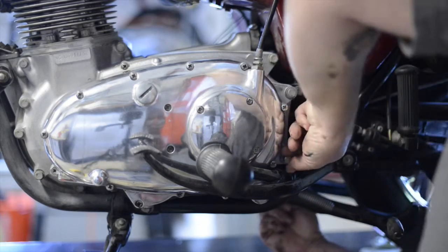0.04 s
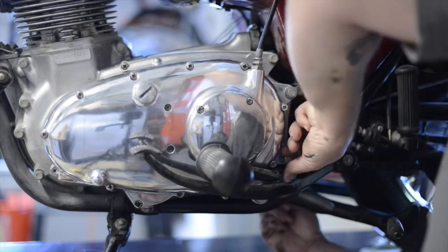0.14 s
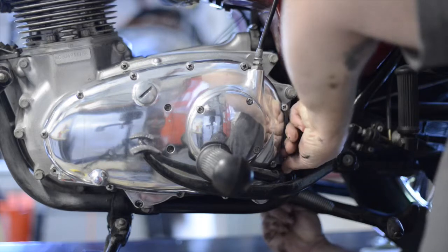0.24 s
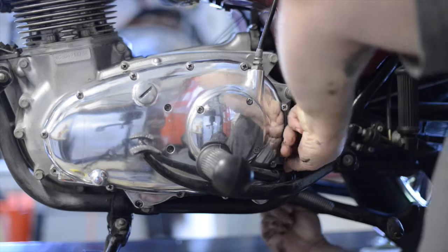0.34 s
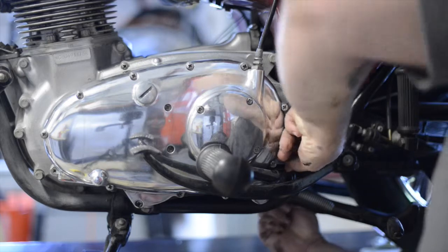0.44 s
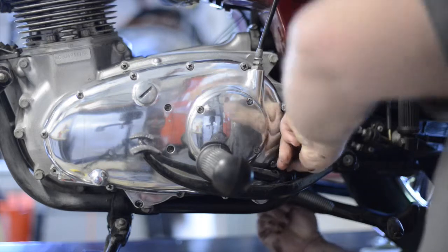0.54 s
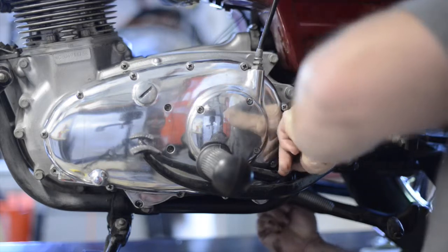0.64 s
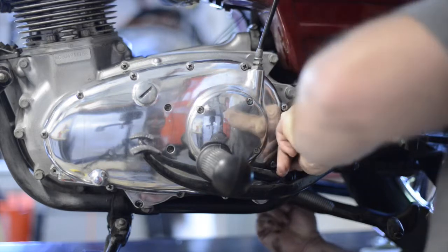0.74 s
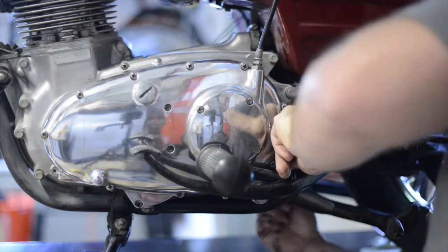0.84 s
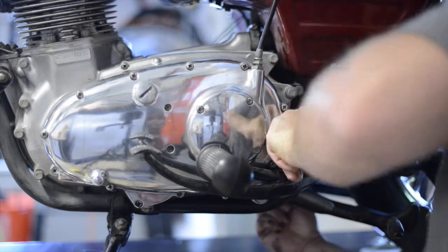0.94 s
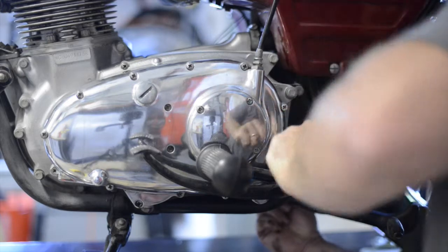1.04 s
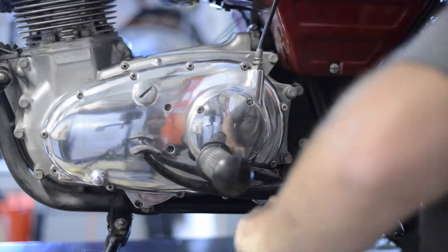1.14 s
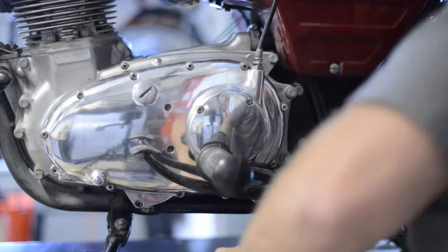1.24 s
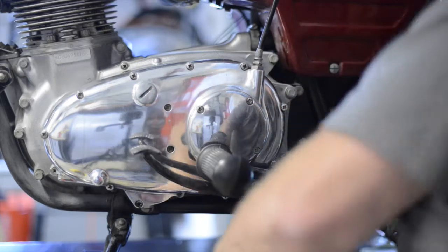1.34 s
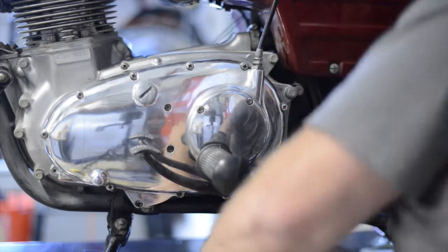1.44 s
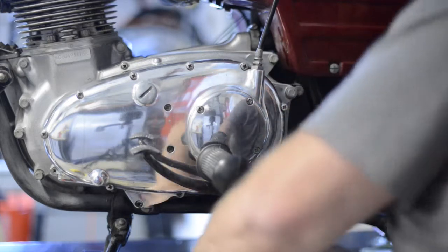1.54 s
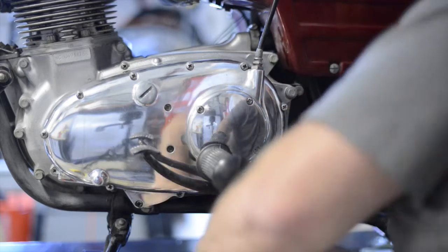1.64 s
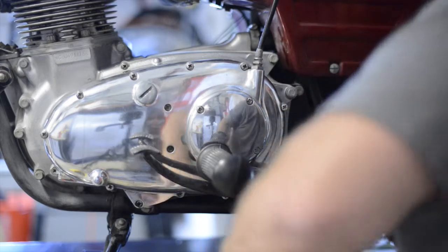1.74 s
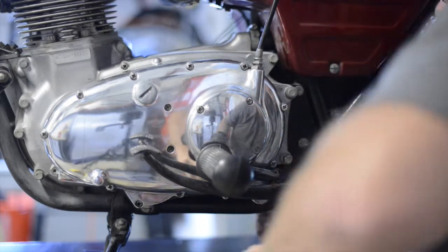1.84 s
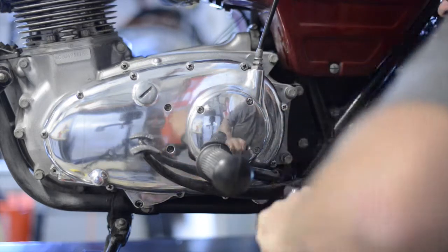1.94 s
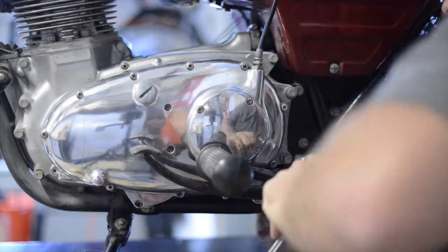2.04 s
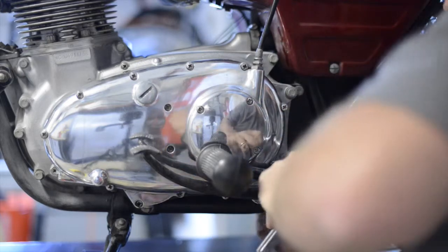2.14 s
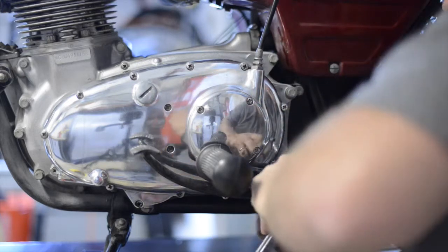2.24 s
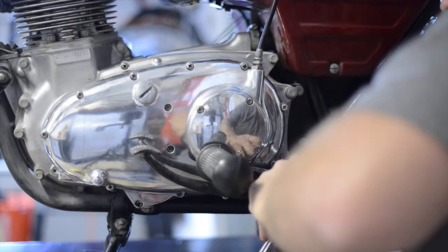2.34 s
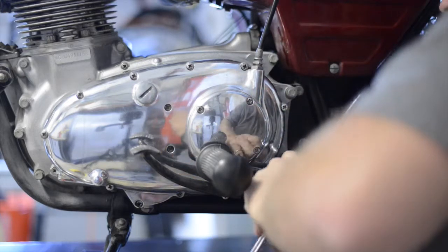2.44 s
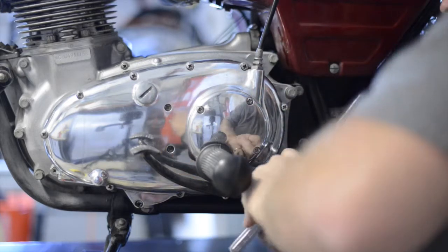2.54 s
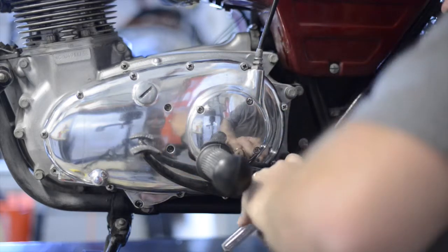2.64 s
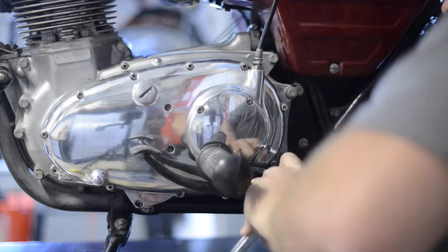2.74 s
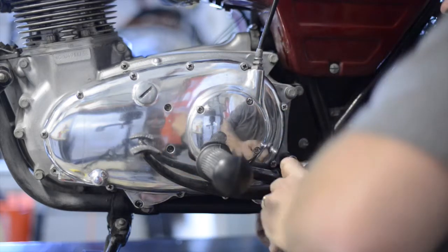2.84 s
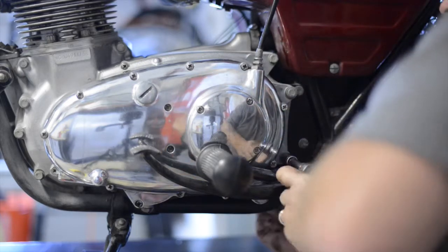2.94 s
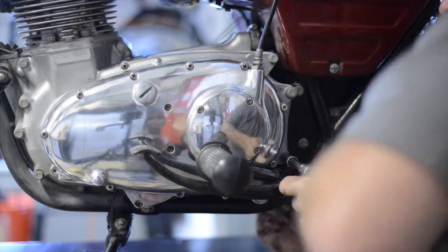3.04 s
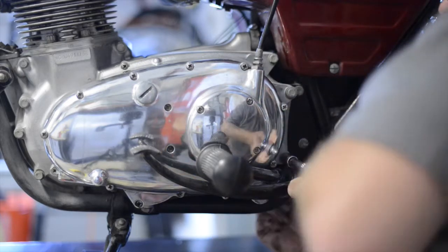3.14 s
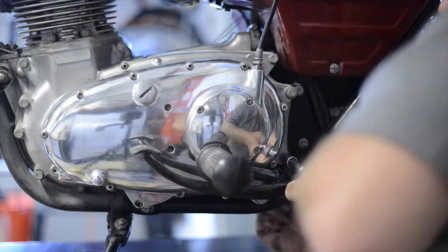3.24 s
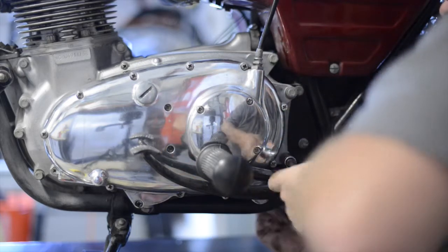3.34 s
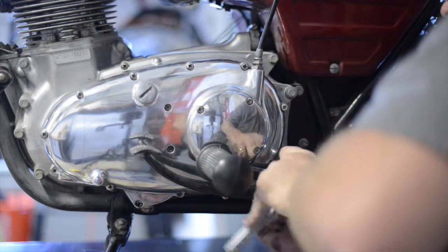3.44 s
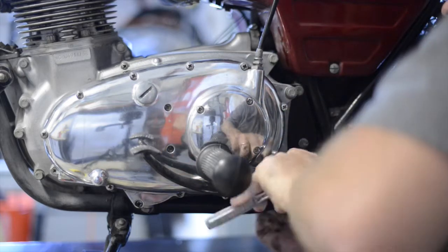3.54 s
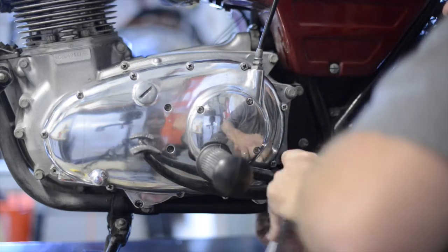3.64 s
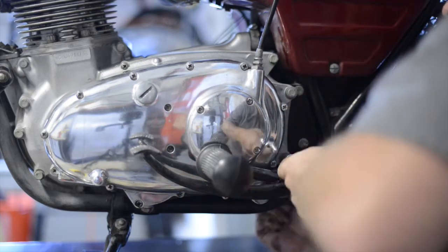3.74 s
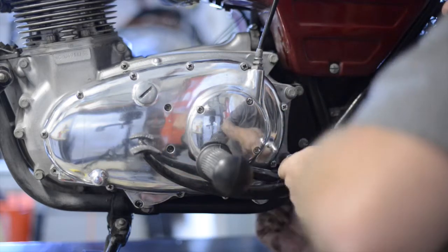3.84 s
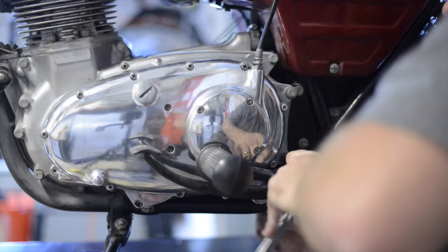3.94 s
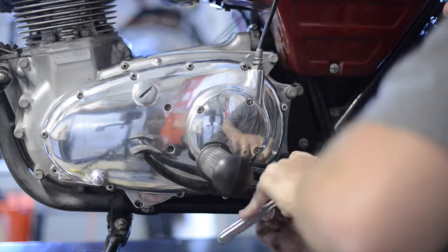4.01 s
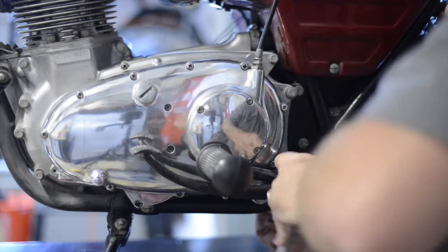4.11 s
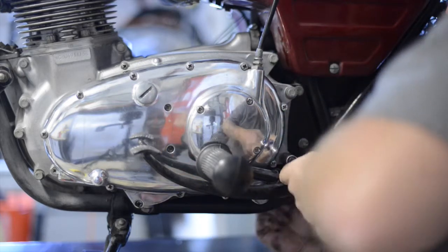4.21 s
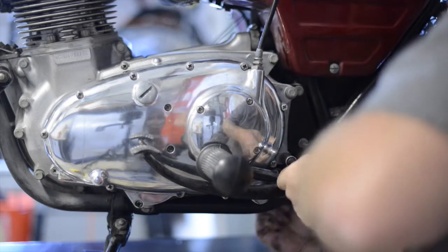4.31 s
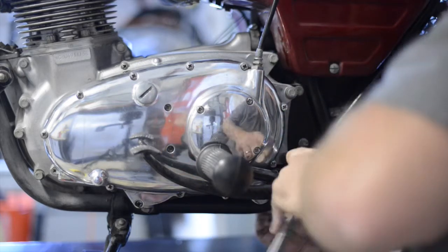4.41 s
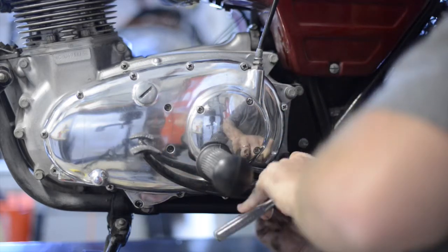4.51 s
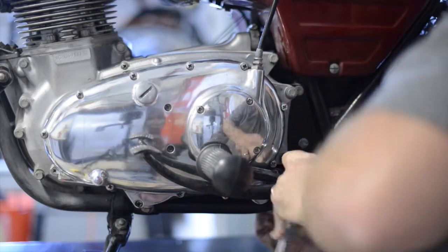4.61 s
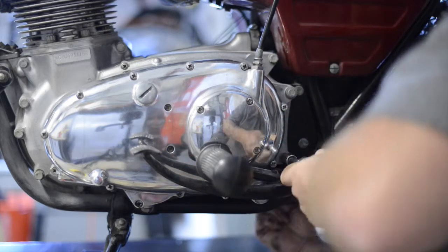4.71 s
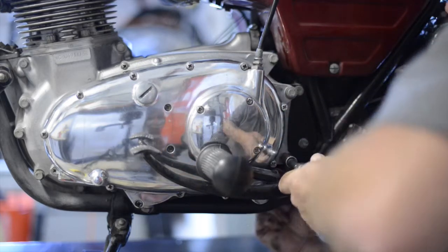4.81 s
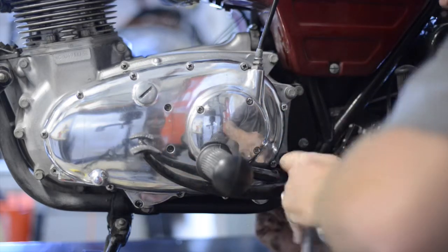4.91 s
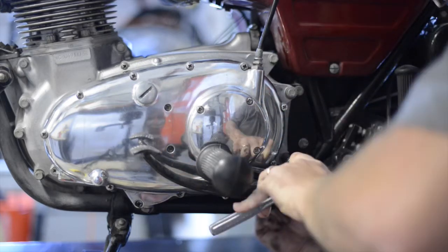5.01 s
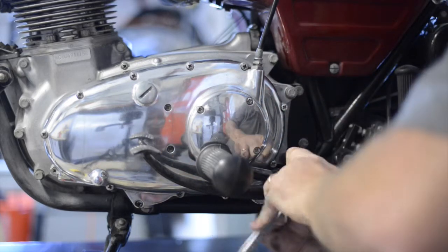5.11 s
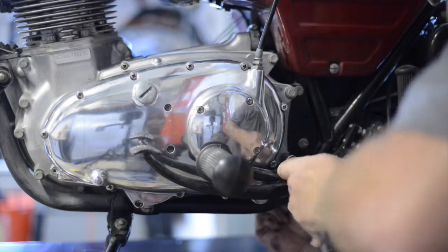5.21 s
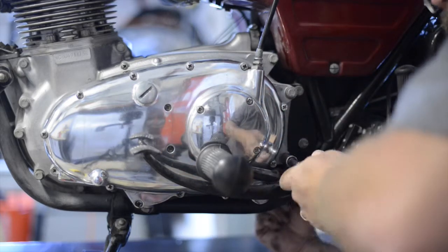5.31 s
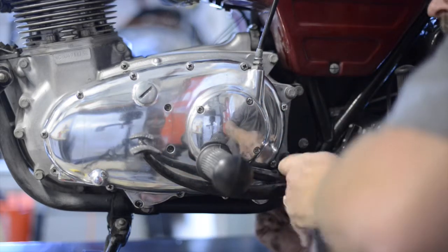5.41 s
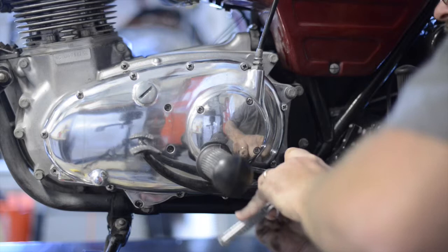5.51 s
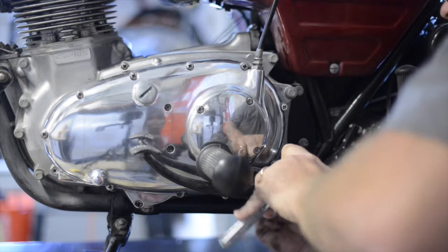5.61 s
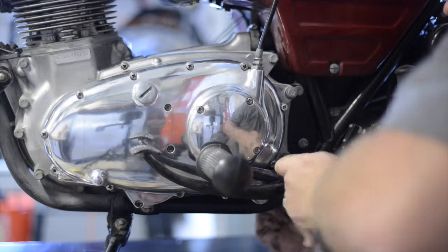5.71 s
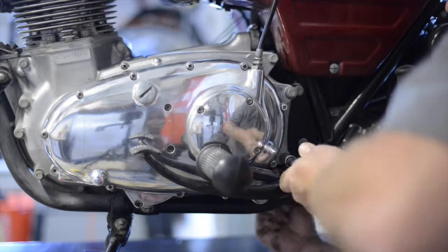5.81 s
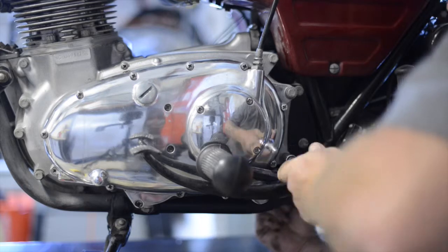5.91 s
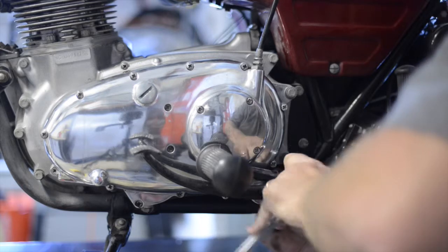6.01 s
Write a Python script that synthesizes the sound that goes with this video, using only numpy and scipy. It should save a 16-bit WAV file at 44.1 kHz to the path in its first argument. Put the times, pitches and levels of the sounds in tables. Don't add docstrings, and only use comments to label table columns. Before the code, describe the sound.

In an echoing workshop, small metal knocks and a loud steel clank with a high ring give way to six rasping bursts of ratchet clicks.

```python
import sys
import numpy as np
from scipy import signal
from scipy.fft import rfft, irfft
from scipy.io import wavfile

SR = 44100
rng = np.random.default_rng(int(sys.argv[2]) if len(sys.argv) > 2 else 0)


def volts(x):
    e = np.asarray(x, float) / 20
    return 10 ** e


def master(y):
    cut = np.clip(np.atleast_2d(y).T, -1, 1)
    pcm = np.round(cut * 32767)
    wavfile.write(sys.argv[1], SR, pcm.astype(np.int16))


N = 267246


def rms_one(x):
    return x / np.sqrt(np.mean(x ** 2) + 1e-30)


def at_hz(points, hz):
    table_hz, values = np.transpose(points)
    return np.interp(np.log(hz + 1), np.log(table_hz), values)


def coloured(spectrum):
    hz = np.arange(N // 2 + 1) * SR / N
    white = rfft(rng.standard_normal(N))
    return rms_one(irfft(white * volts(at_hz(spectrum, hz)), N))


def band(x, low_hz, high_hz):
    return signal.sosfilt(signal.butter(2, [low_hz, high_hz], "band", fs=SR, output="sos"), x)


def high_pass(x, hz):
    return signal.sosfilt(signal.butter(2, hz, "high", fs=SR, output="sos"), x)


def resonance(x, hz, width_hz):
    r = np.exp(-np.pi * width_hz / SR)
    gain = (1 - r * r) / 2
    return signal.lfilter(gain * np.array([1, 0, -1]), [1, -2 * r * np.cos(2 * np.pi * hz / SR), r * r], x)


def rattle(t, tau, even=0.6):
    fade = np.exp(-t / tau)
    spectrum = rfft(rng.standard_normal(len(t)) * fade)
    return irfft(spectrum / np.abs(spectrum) ** even, len(t)) * np.sqrt(fade)


def struck(s, db, modes):
    out, start = np.zeros(N), int(s * SR)
    t = np.arange(min(SR, N - start)) / SR
    for hz, mode_db, t60 in modes:
        decay = volts(db + mode_db - 60 * t / t60)
        out[start:start + len(t)] += decay * np.sin(2 * np.pi * (hz * t + rng.random()))
    return out


# f/Hz, level/dB per Hz
FLOOR = [(12, -42), (20, -10), (38, -14), (110, 0), (167, -12.5), (233, -5), (275, -15), (316, -5.5),
         (523, -10.5), (584, -10), (1020, -15), (1110, -14.5), (3480, -18.5), (8040, -20.5), (15700, -31)]
# t/s, level/dB
FLOOR_LEVEL = [
    (0, -67),
    (1.6, -67),
    (2.0, -68.5),
    (3.2, -68.5),
    (6.06, -68),
]
# t/s, level/dB
RUMBLE_LEVEL = [
    (0.0, -53),
    (1.4, -62),
    (1.9, -56.5),
    (4.4, -63),
    (6.06, -63),
]
FAN_HZ, FAN_WIDTH_HZ, FAN_DB = 115.5, 2.1, -63
SURGE_START_S, SURGE_END_S, SURGE_DB, SURGE_RAMP_S = 0.75, 1.73, 8.5, 0.055


def background():
    t = np.arange(N) / SR
    hiss = coloured(FLOOR)
    hiss = hiss / np.std(band(hiss, 11500, 15500))
    rumble = rms_one(band(rng.standard_normal(N), 53, 178))
    waver = resonance(rng.standard_normal(N), FAN_HZ, FAN_WIDTH_HZ)
    waver = rms_one(resonance(waver, FAN_HZ, FAN_WIDTH_HZ))
    fan = 0.7 * waver + np.sqrt(2) * np.sin(2 * np.pi * FAN_HZ * t)
    load = np.clip(np.minimum(t - SURGE_START_S, SURGE_END_S - t) / SURGE_RAMP_S, 0, 1)
    hiss_db = np.interp(t, *np.transpose(FLOOR_LEVEL))
    rumble_db = np.interp(t, *np.transpose(RUMBLE_LEVEL))
    return volts(hiss_db + 0.38) * hiss + volts(rumble_db) * rumble + volts(FAN_DB + SURGE_DB * load) * fan


# t/s, peak level/dB at 2-6 kHz,
# then levels/dB re peak of the thud under 800 Hz, the clack to 2 kHz and the tick to 10 kHz
KNOCKS = [(0.0004, -36.5, 13.5, 3.5, -9), (0.238, -40, 8.5, -8, -3), (0.5579, -24.5, -10.5, -7, -28),
          (0.835, -31.5, -11, 0, -24), (1.5659, -23.5, -34, -8, 2), (1.6662, -1, -32, -23, -1.5),
          (1.6726, 0.5, -26, -16, -13), (2.271, -54, -18, -15, -12), (2.3115, -15, -22.5, -18, 1.2),
          (2.3362, -30.5, -9, 1, -11), (2.398, -45.5, 12, 3, -15), (2.751, -58, -20, -22, -5),
          (2.5144, -33, -10, -7, -4), (2.5541, -17.5, -31, -6.5, -6), (2.5676, -33.5, -4.5, 0, -17),
          (2.8762, -35.5, -26, -29, 5.5), (2.8994, -53, -17, -16, 5), (3.2127, -27, -3.5, -13, -20),
          (3.2442, -11, -5, -7, -27), (4.6628, -24, -13.5, -4.5, -5), (4.918, -38, -3, 1.5, -2.5),
          (5.7219, -24, -13, -3.5, 5)]
# t/s, peak level/dB, tick level/dB re peak
SLACK = [
    (3.921, -29, -20),
    (3.9335, -27, 1),
    (3.9412, -25, -8),
    (4.4208, -23, -0.5),
    (4.4392, -24.5, -3),
    (5.467, -32, -25),
    (5.481, -33, -12),
    (5.969, -32, -14),
    (5.976, -36, -6),
]
# t/s, peak level/dB over 10 kHz
TICKS = [(1.5648, -45), (1.664, -16), (2.312, -31), (2.3361, -34), (2.5531, -37), (2.8993, -46),
         (4.4214, -37), (4.6598, -31), (4.9167, -38), (5.7204, -31), (5.9774, -43.5)]
SLACK_THUD_DB, SLACK_CLACK_DB = -25, -9
KNOCK_S = 0.0049


def knocks():
    out, t = np.zeros(N + SR), np.arange(SR // 8) / SR
    slack = [(s, db, SLACK_THUD_DB, SLACK_CLACK_DB, tick_db) for s, db, tick_db in SLACK]
    for s, peak_db, thud_db, clack_db, tick_db in list(KNOCKS) + slack:
        start = int(s * SR)
        parts = ((170, 800, thud_db, 3.5), (800, 2000, clack_db, 1.6),
                 (2000, 5500, 0, 1.1), (6000, 10500, tick_db, 0.7))
        for low_hz, high_hz, db, longer in parts:
            burst = rms_one(band(rattle(t, longer * KNOCK_S), low_hz, high_hz))
            out[start:start + len(t)] += volts(peak_db + db - 12) * np.sqrt(4 * longer * KNOCK_S) * burst
    for s, peak_db in TICKS:
        tick = rms_one(band(rattle(t, 0.0023), 12000, 16000))
        out[int(s * SR):][:len(t)] += volts(peak_db - 30.5) * tick
    return out[:N]


# f/Hz, level/dB, t60/s
BRACKET = [(1444, -2.5, 0.012), (1620, -18, 0.023), (2290, 3.5, 0.011), (2620, 4.5, 0.0047),
           (2830, -6, 0.009), (3800, -2.5, 0.012)]
# (f/Hz, level/dB, t60/s)
CLANK = (-8.5, [(760, -12, 0.023), (880, -10.5, 0.034), (896, -10.5, 0.04), (1134, -8, 0.054),
         (1197, -11, 0.076), (2160, -8.5, 0.03), (2660, -3.5, .04), (3046, -5, 0.058), (3380, -6, 0.062),
         (3850, -5, .04), (4330, -6, 0.039), (4470, -3.5, .05), (5060, -30, .04), (5900, 1.5, 0.055),
         (6040, -18, 0.058), (6230, -0.5, 0.057), (7210, -4.5, 0.038), (8100, -7.5, 0.036),
         (9170, -4.5, 0.035)])
# (f/Hz, level/dB, t60/s)
TAPS = [(-24, BRACKET), (-33.5, BRACKET), (-34.5, [(188, 1.5, 0.11), (337, -2, 0.028)]),
        (-18, [(3320, -15, 0.0056), (4320, 1, 0.0077), (8000, -14, 0.011), (10300, -7, 0.0076)]),
        (-29.5, [(4600, -5, .008), (5400, -1, 0.012), (9900, 1, .01)]), (-23.5, [(3160, 8, 0.0053),
        (3730, 3, 0.0079), (8050, -13.5, 0.023)]), (-31, [(4100, -5.5, 0.0065), (5880, -5, 0.006),
        (8130, -4.5, 0.023)]), (-34.5, [(200, 5, 0.064), (378, 5, 0.071), (570, 0, 0.029)]),
        (-24.5, [(213, 2, 0.018), (327, -5.5, 0.049), (425, -4, 0.039), (754, -1.5, 0.029),
        (2200, 5, 0.022), (2820, 8, 0.0075), (5950, -5, 0.018), (7870, -4.5, .02)]),
        (-26.5, [(1810, -1, 0.0093)]), (-19.5, [(8200, 6.5, 0.017)]), (-24, [(8410, 8.5, 0.018)]), CLANK]
TAPS_S = [0.5560, 0.836, 0.242, 2.311, 2.337, 2.5535, 2.873, 3.222, 3.242, 4.662, 5.5741, 5.6176, 1.6645]
HELD_T60 = 0.022


def ringing():
    out = np.zeros(N)
    for s, (db, modes) in zip(TAPS_S, TAPS):
        held = [(hz, mode_db, min(t60, HELD_T60 + 15 / hz)) for hz, mode_db, t60 in modes]
        out += struck(s, db, held)
    return out


# t/s, level/dB
DRAGS = [
    [(1.54, -72), (1.566, -31), (1.606, -29), (1.658, -42), (1.664, -28)],
    [(3.19, -70), (3.2, -71), (3.212, -45), (3.245, -41)],
]
# f/Hz, level/dB per Hz
DRAG = [(120, -49), (200, -20), (522, -6.5), (1110, -12), (1270, -5.5), (5100, -21.5), (8230, -32.5),
        (12000, -68), (15600, -78), (22000, -120)]


def drags():
    t, level = np.arange(N) / SR, np.zeros(N)
    for rows in DRAGS:
        level += volts(np.interp(t, *np.transpose(rows), left=-150, right=-150))
    return volts(-7.5) * level * coloured(DRAG)


# f/Hz, level/dB, t60/s
SOCKET = [
    (10403, -36, 1.7),
    (10405.3, -40, 1.1),
    (13505, -24, .22),
    (15157, -30, .5),
    (15652, -30, .42),
]
SOCKET_STRUCK_S, SOCKET_HELD_S = 1.665, 2.311


def socket():
    free = np.arange(N) < SOCKET_HELD_S * SR
    return volts(-1.5) * struck(SOCKET_STRUCK_S, 0, SOCKET) * free


# first snap t/s, snaps, speed/teeth per s at the start, half way and at the end
STROKES = [
    (3.4417, 11, 57.8, 84.3, 45.4),
    (3.9559, 9, 66.5, 76.1, 45.5),
    (4.4568, 8, 76.7, 81.2, 60.4),
    (4.9965, 8, 106, 95, 66.1),
    (5.5082, 7, 68.7, 56.2, 43.6),
    (6.0085, 5, 87.7, 91.7, 89),
]
# first snap level/dB, change by the last snap/dB,
# then levels/dB of the low group, the high group and the handle
GRIP = [
    (-18, -3.5, -1, 5, -21.5),
    (-18, -6.5, 7, 7.5, -21),
    (-18.5, -4, 4.5, 6, -20.5),
    (-15.5, -7.5, -5.5, -0.5, -18.5),
    (-19, -4, -13, 1, -21.5),
    (-18, -2, -0.5, -14, -25),
]
# t/s, level/dB
HALF_SNAPS = [
    (4.9844, -20),
    (5.4888, -26.5),
    (5.99, -29.5),
]
FIRST_SNAP_EXTRA_DB = 1
SNAP_SCATTER_DB = 1.76


def snap_rows():
    rows = []
    for (first_s, snaps, *speeds), (first_db, change_db, *colour) in zip(STROKES, GRIP):
        parabola = np.polyfit([0, 0.5, 1], speeds, 2)
        teeth_per_s = np.polyval(parabola, np.linspace(0, 1, snaps - 1))
        times = first_s + np.cumsum(np.append(0, 1 / teeth_per_s))
        levels = first_db + change_db * np.linspace(0, 1, snaps) ** 2
        levels = levels + SNAP_SCATTER_DB * rng.standard_normal(snaps)
        levels[0] += FIRST_SNAP_EXTRA_DB
        opening = [(s, db) for s, db in HALF_SNAPS if 0 < first_s - s < 0.1]
        rows += [(s, db, *colour) for s, db in opening + list(zip(times, levels))]
    return rows


# f/Hz, width/Hz, level/dB
HEAD_LOW = [(2090, 230, -12.5), (3090, 530, -3.5), (3950, 314, -1.5)]
HEAD_MID = [(4670, 530, -2.5), (4960, 120, 5.5), (5920, 750, 1), (6370, 240, 1), (6660, 200, 0.5)]
HEAD_HIGH = [(7600, 600, -7.5), (8380, 600, 0.5), (8650, 2200, -8), (10200, 300, -20), (14600, 2400, -13.5)]
# f/Hz, level/dB per Hz
PAWL_CRACK = [(180, -39), (300, -68), (418, -24.5), (634, -47), (762, -14), (1530, -1), (3190, -10),
              (5900, 6.5), (8640, -2.5), (15000, -13), (16000, -9)]
CRACK_DB = -3.5
LANDING_DB, LANDING_S = -5, 0.0008


def pawl():
    out, t = np.zeros(N + SR), np.arange(SR // 25) / SR
    crack_noise = coloured(PAWL_CRACK)
    blow = np.zeros(len(t))
    blow[int(LANDING_S * SR)] = 1
    landing = volts(LANDING_DB) * rms_one(band(blow, 3000, 9000))
    for s, snap_db, low_db, high_db, handle_db in snap_rows():
        start = int(s * SR) - 10
        snap = volts(CRACK_DB) * crack_noise[start - SR:][:len(t)] * np.exp(-t / 0.0008)
        for modes, group_db in ((HEAD_LOW, low_db), (HEAD_MID, 0), (HEAD_HIGH, high_db)):
            contact = 0.1 * rms_one(rattle(t, 0.00052))
            for k, (hz, width_hz, db) in enumerate(modes):
                sign = (-1) ** k
                snap += sign * volts(group_db + 5 + db) * resonance(contact, hz, width_hz)
        snap = rms_one(band(snap, 2330, 15600))
        snap += volts(handle_db) * rms_one(band(rattle(t, 0.0044), 700, 2400))
        snap += landing
        out[start:start + len(t)] += volts(snap_db - 12.5) * snap
    return out[:N]


# f/Hz, t60/s
SHOP_T60 = [(150, 0.55), (500, 0.98), (1500, 0.87), (4000, 0.67), (8000, 0.51), (12000, 0.34),
            (16000, 0.28)]
SHOP_DB, SHOP_BUILD_S = -9.5, 0.0013
NEARBY_DB, NEARBY_S = -4.5, 0.0025


def workshop(x):
    t = np.arange(SR + SR // 4) / SR
    edges_hz = 60 * 2 ** np.arange(0, 8.3, 0.4)
    white = rng.standard_normal((2, len(t)))
    tail = np.zeros(len(t))
    for k, (low_hz, high_hz) in enumerate(zip(edges_hz, edges_hz[1:])):
        t60 = at_hz(SHOP_T60, np.sqrt(low_hz * high_hz))
        tail += band(white[k % 2], low_hz, high_hz) * volts(-60 * t / t60)
    tail = tail * (1 - np.exp(-t / SHOP_BUILD_S))
    nearby = rattle(t, NEARBY_S, even=0.95) * (t > 0.0008)
    echoes = volts(SHOP_DB + 10.5) * rms_one(tail) + volts(NEARBY_DB) * rms_one(nearby)
    return x + signal.fftconvolve(x, echoes / np.sqrt(len(t)))[:N]


def scene():
    near = socket()
    tool = knocks() + ringing() + drags() + 0.16 * near + pawl()
    tool = high_pass(tool, 150)
    return (background() + workshop(tool) + near)[None]


def roll_off(x):
    return signal.sosfilt(signal.butter(12, 16990, fs=SR, output="sos"), x)


def record(dry):
    soft = 1.1 * np.tanh(dry / 1.1)
    top_cut = signal.cheby2(14, 26, 16050, fs=SR, output="sos")
    mix = signal.sosfilt(top_cut, soft)
    return roll_off(mix)


dry = scene()
out = record(dry)
master(out)
```